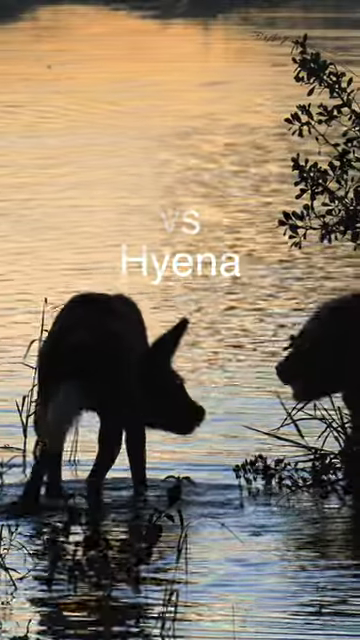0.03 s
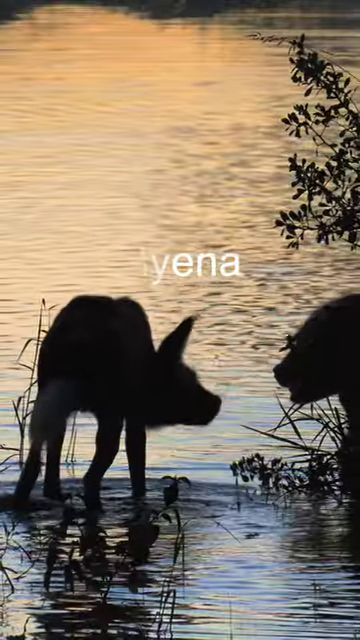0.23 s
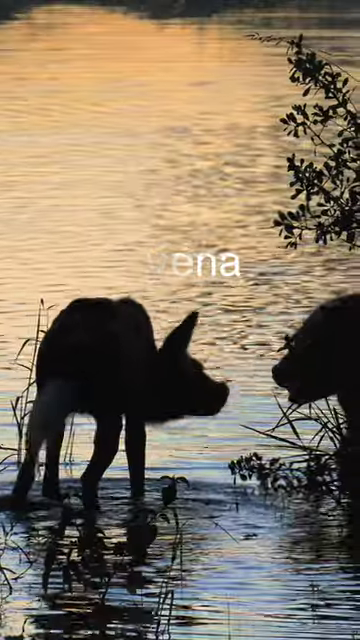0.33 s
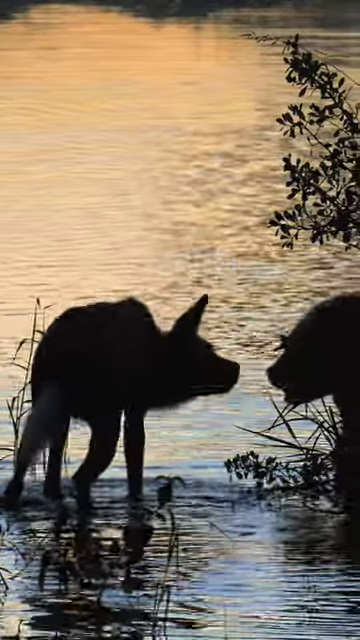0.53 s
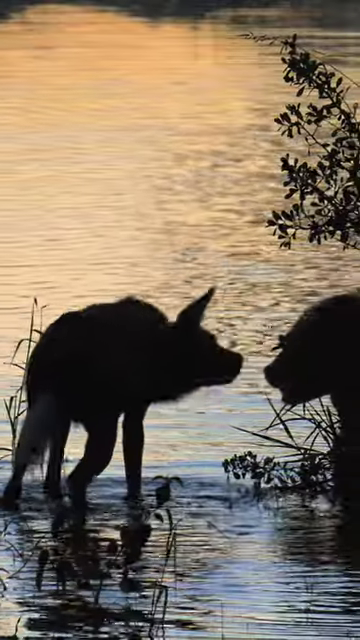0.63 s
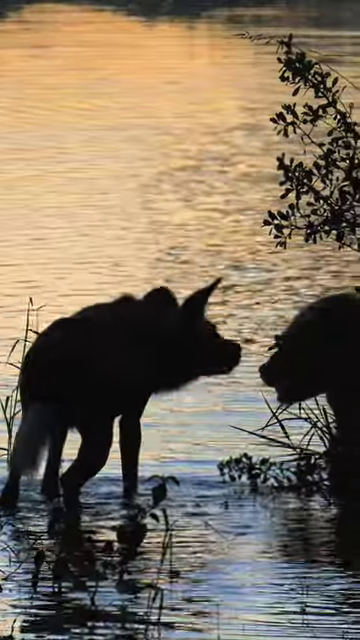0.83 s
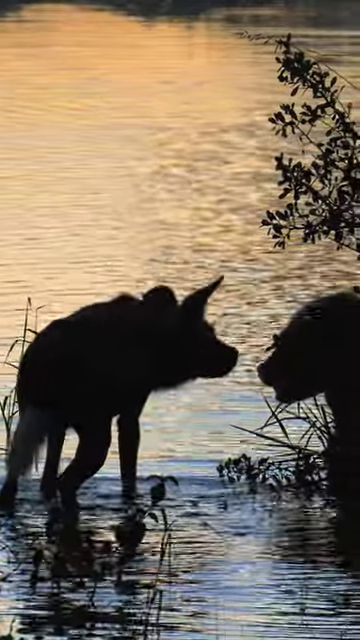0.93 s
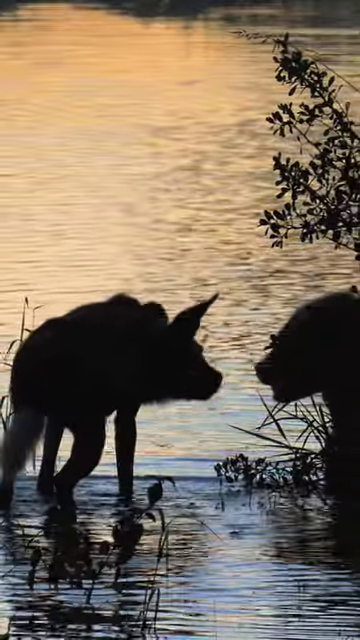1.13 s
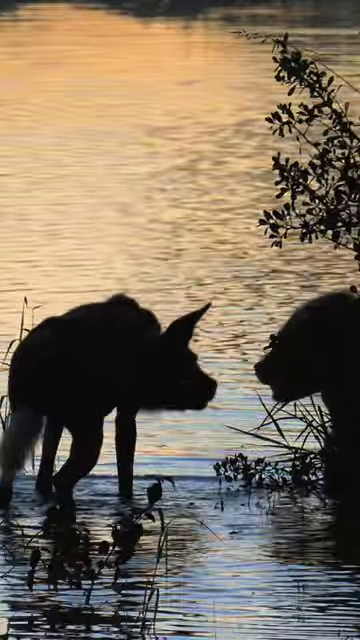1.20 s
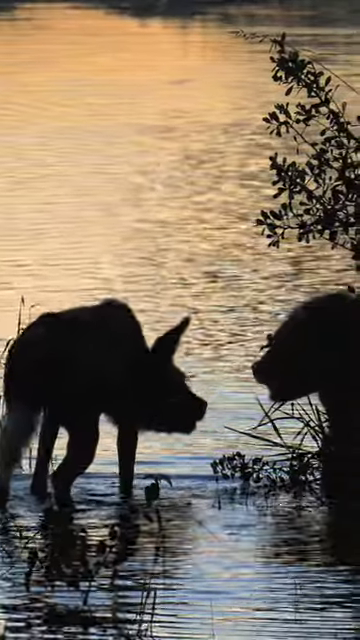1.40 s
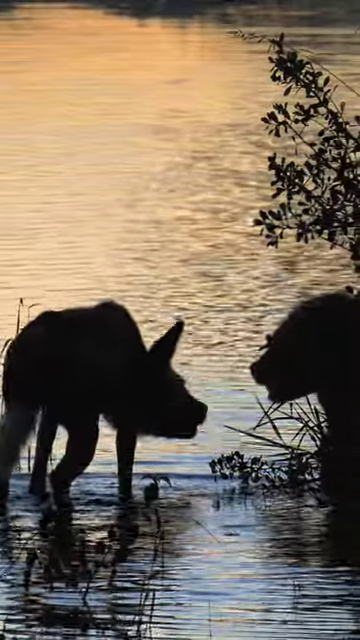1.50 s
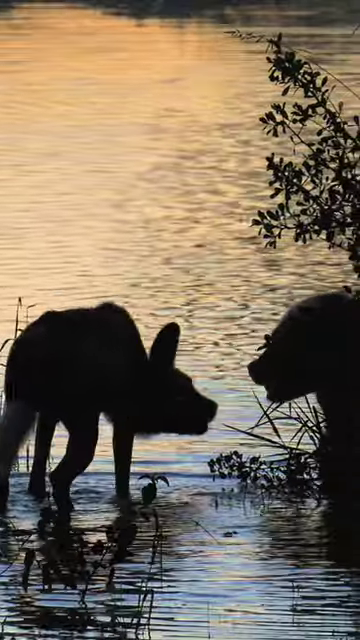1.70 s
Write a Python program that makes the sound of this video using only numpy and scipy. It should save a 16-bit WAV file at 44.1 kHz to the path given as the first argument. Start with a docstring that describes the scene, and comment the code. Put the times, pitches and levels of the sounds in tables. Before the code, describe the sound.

A lion gives one low growl while a hyena sloshes softly through shallow water.

```python
"""At the edge of a waterhole, a lion gives one low growl. Slow, separate vocal-fold pulses speed up
into a clear tone as the throat tenses, sag again and end in a rush of air; the banks echo weakly.
A hyena wades in the shallows: soft sloshes, ringing air pockets, drips and falling spray over the
hiss of stirred water. Behind them lie a low rumble, a faint hum and a thin high note."""
import sys
import numpy as np
from scipy import signal
from scipy.fft import rfft, irfft, next_fast_len
from scipy.io import wavfile

SR = 44100
rng = np.random.default_rng(int(sys.argv[2]) if len(sys.argv) > 2 else 0)


def generate_wav(signal):
    """Clip the signal to [-1, 1] and save it as 16-bit WAV at the path in sys.argv[1]."""
    frames = np.transpose(np.atleast_2d(signal))
    scaled = np.clip(frames, -1, 1) * 32767
    pcm = np.round(scaled).astype(np.int16)
    wavfile.write(sys.argv[1], SR, pcm)


N = 77175
T = np.arange(N) / SR

# background rumble spectrum: freq_hz, gain_db
RUMBLE_SPECTRUM = [(15, 4.5), (40, -22), (600, -36.5)]
# faint steady notes: start_s, end_s, pitch_hz, width_hz, level_db
FAR_NOTES = [(1.48,1.75,135,4,-67),(1.5,1.75,4620,70,-60)]
# left-right likeness of the noise: freq_hz, correlation
STEREO_LIKENESS = [(25, 0), (90, 1), (5500, 0.87), (8500, 0.12), (15000, 0)]

# stirred water: time_s, hiss_db, lapping_db
WATER_LEVELS = [(0,-59.5,-73),(.4,-59.5,-45),(.7,-54,-44.5),(1.15,-55.5,-53.5),(1.38,-49.5,-53),(1.51,-56,-58),(1.72,-48,-56.5)]
# water hiss spectrum: freq_hz, gain_db
HISS_SPECTRUM = [(1000,-8.5),(2000,3.5),(6000,-5.5),(9500,-18.5),(15500,-34.5)]
# lapping spectrum: freq_hz, gain_db
LAPPING_SPECTRUM = [(280,-12.5),(800,0),(1550,0.5),(6000,-67)]
# fine spray falling back: start_s, level_db, decay_s
SPLASHES = [(.722,-49,0.011),(0.847,-51.5,0.022),(1,-50.5,0.021)]
# fine spray spectrum: freq_hz, gain_db
SPLASH_SPECTRUM = [(1200, -22.5), (2500, -3), (4500, -1.5), (6800, -6), (9000, -17), (15000, -27.5)]
# drops landing: start_s, tick_db, pitch_hz, snap_db
DRIPS = [(0.361, -38, 6260, -42), (.375, -37.5, 6240, -47.5), (1.182, -29, 4200, -30),
         (1.237, -34.5, 4800, -42)]
# snap of a drop breaking the surface: freq_hz, gain_db
SNAP_SPECTRUM = [(1500, -22), (3800, 0), (6500, 1), (9000, -2), (15000, -16)]
# air pockets: start_s, level_db, pitch_hz
GURGLES = [(1.003,-38,620),(1.034,-39.5,503),(1.327,-38.5,600),(1.371,-36,474)]
# steps in the shallows: start_s, thud_db, spray_db, decay_s
STEPS = [(1.368, -53.5, -44, 0.023), (1.598, -66, -44, 0.016), (1.696, -49.5, -41.5, 0.019)]
# step thud spectrum: freq_hz, gain_db
THUD_SPECTRUM = [(60, -18.5), (190, 9), (260, -6.5), (1500, -50)]
# step spray spectrum: freq_hz, gain_db
SPRAY_SPECTRUM = [(200, -27), (500, 14), (1800, 12.5), (6000, -16), (12000, -42)]

# air ending the growl: time_s, level_db, mouth_hz
BREATH = [(.74, -44.5, 900), (.80, -39, 900), (.87, -41, 1035), (.95, -42, 980), (1.03, -45, 825.4),
          (1.2, -56, 643)]
# breath spectrum: freq_hz, gain_db
BREATH_SPECTRUM = [(280,-14),(650,2.5),(1600,-14),(5000,-56.5)]
# wet rasp in the mouth: time_s, level_db
WET_RASP_LEVEL = [(0.422, -72), (.49, -60), (0.679, -66.5), (.74, -70)]
# deep chest tone: time_s, gain_db
CHEST_GAIN = [(0, -53.5), (0.241, -55), (0.369, -44), (.55, -46.5), (.72, -47), (0.851, -54.5), (1.0, -86)]
# chest harmonics: multiple, slack_db, tense_db
CHEST_HARMONICS = [(1, -3, -2.5), (2, -1.5, -17), (3, 0.5, 3.5), (4, -1.5, 6), (5, -4, -8)]
# slack throat response, slow pulses: freq_hz, gain_db
SLACK_THROAT = [(200,-34.5),(470,2),(780,5.5),(1040,-11.5),(1350,-3),(2500,-42),(12000,-71)]
# tense throat response, fast pulses: freq_hz, gain_db
TENSE_THROAT = [(150,-43.5),(290,-21.5),(460,9),(560,1.5),(920,5),(1070,-20),(1270,7),(1440,-12),(1690,-7),(1800,-22.5),(2500,-53),(12000,-71)]
# narrow resonance, strong on the rise and fall of the pitch: time_s, gain
THROAT_RING = [(0.376, 1.5), (0.441, 8), (0.502, 0.12), (.63, 0.45), (0.699, 8.7), (0.772, 2.4)]
# vocal-fold pulse rate: time_s, rate_hz
PULSE_RATE = [(0, 46.2), (.19, 48.1), (.28, 55), (.36, 68.7), (.43, 85.5), (.53, 90.1), (.62, 87.4),
              (.69, 81.9), (.76, 55.7), (.92, 38)]
# pulse strength: time_s, gain_db
EFFORT = [(0,-41.5),(.1,-47),(.21,-44),(.295,-31.5),(.36,-29.5),(.4,-32.5),(.46,-27.5),(.54,-25.5),(.71,-33.5),(.8,-35),(.83,-73)]
# voice roughness: time_s, fraction
ROUGHNESS = [(0, .2), (.11, .2), (.16, .5), (.22, .25), (.28, .18), (.40, .12), (.46, .03), (.66, .04),
             (.73, .25), (.79, .45)]


def from_db(db):
    return 10 ** (np.asarray(db) / 20)


def unit_rms(x):
    return x / np.sqrt(np.mean(x ** 2) + 1e-20)


def in_time(rows):
    """Table columns interpolated per sample."""
    time_s, *columns = np.transpose(rows)
    return [np.interp(T, time_s, column) for column in columns]


def at_hz(spectrum, hz):
    """Spectrum interpolated on a log-frequency axis."""
    freq_hz, values = np.transpose(spectrum)
    return np.interp(np.log(hz + 1), np.log(freq_hz), values)


def colour(x, spectrum):
    """Minimum-phase filter; keeps the power of white noise."""
    size = 2 * next_fast_len(N)
    gain = unit_rms(from_db(at_hz(spectrum, np.fft.rfftfreq(size, 1 / SR))))
    cepstrum = irfft(np.log(gain))
    cepstrum[1:size // 2] *= 2
    cepstrum[size // 2 + 1:] = 0
    return irfft(rfft(x, size) * np.exp(rfft(cepstrum)))[..., :N]


def resonate(x, hz, width_hz, passes=1):
    """Two-pole resonance, unity peak gain."""
    r = np.exp(-np.pi * width_hz / SR)
    feedback = [1, -2 * r * np.cos(2 * np.pi * hz / SR), r * r]
    for _ in range(passes):
        x = signal.lfilter(np.array([1, 0, -1]) * (1 - r * r) / 2, feedback, x)
    return x


def lowpass(x, cutoff_hz):
    return signal.sosfilt(signal.butter(2, cutoff_hz, fs=SR, output="sos"), x)


def noise():
    return rng.standard_normal(N)


def wide_noise(spectrum):
    """Stereo noise: sides alike in the midrange, apart in the treble."""
    likeness = np.clip(at_hz(STEREO_LIKENESS, np.fft.rfftfreq(N, 1 / SR)), 0, 1)
    mid = irfft(rfft(noise()) * np.sqrt((1 + likeness) / 2), N)
    side = irfft(rfft(noise()) * np.sqrt((1 - likeness) / 2), N)
    return colour(np.array([mid + side, mid - side]), spectrum)


def clicks(times_s, sizes):
    return np.bincount(np.clip(times_s * SR, 0, N - 1).astype(int), sizes, N)


def burst(start_s, attack_s, decay_s):
    """Linear rise, exponential fall."""
    age_s = T - start_s
    return np.clip(age_s / attack_s, 0, 1) * np.exp(-np.maximum(age_s - attack_s, 0) / decay_s)


def pan(x, left_over_right_db):
    return x * from_db(np.array([[1], [-1]]) * left_over_right_db / 2)


def surroundings(rumble_db=-58, fade_s=0.036):
    """Low rumble, a faint hum and a thin, insect-like high note."""
    out = from_db(rumble_db) * wide_noise(RUMBLE_SPECTRUM)
    for start_s, end_s, pitch_hz, width_hz, level_db in FAR_NOTES:
        fade = np.clip((T - start_s) / fade_s, 0, 1) * np.clip((end_s - T) / fade_s + 1, 0, 1)
        out += from_db(level_db) * fade * unit_rms(resonate(noise(), pitch_hz, width_hz, passes=2))
    return out


def bank_echo(x, gain_db=-30, t60_s=0.24, delay_s=0.027):
    """Weak echo scattered by the banks."""
    tail = noise() * from_db(-60 * T / t60_s) * (T > delay_s)
    return from_db(gain_db) * signal.fftconvolve(x, tail / np.linalg.norm(tail))[:N]


def droplets(rate_per_s=450, spread_db=5):
    """Tiny droplets, each ringing a few cycles."""
    sizes = from_db(spread_db * np.minimum(rng.exponential(1, N), 3))
    impacts = sizes * rng.choice([-1, 1], N) * (rng.random(N) < rate_per_s / SR)
    pitches_hz = np.geomspace(1500, 6800, 20)
    pitch_index = rng.integers(0, len(pitches_hz), N)
    rings = sum(resonate(impacts * (pitch_index == k) + 1e-18, hz, 0.14 * hz) / np.sqrt(hz)
                for k, hz in enumerate(pitches_hz))
    return unit_rms(colour(unit_rms(rings), HISS_SPECTRUM))


def stirred_water(droplet_gain_db=-7):
    """Stirred shallows: hiss with droplets over low lapping."""
    hiss_db, lapping_db = in_time(WATER_LEVELS)
    hiss = from_db(droplet_gain_db) * droplets() + wide_noise(HISS_SPECTRUM)
    return from_db(hiss_db) * hiss + from_db(lapping_db) * wide_noise(LAPPING_SPECTRUM)


def splashes(attack_s=0.012):
    """Fine spray falls back in short bright bursts."""
    envelope = sum(from_db(level_db) * burst(start_s, attack_s, decay_s)
                   for start_s, level_db, decay_s in SPLASHES)
    return envelope * wide_noise(SPLASH_SPECTRUM)


def drips(tick_s=0.0005, spatter_gain_db=-14, spatter_decay_s=0.006):
    """Each drop lands with a bright snap, a high tick and a little spatter."""
    starts_s, _, _, snap_db = np.transpose(DRIPS)
    out = colour(clicks(starts_s + tick_s, from_db(snap_db)), SNAP_SPECTRUM)
    spatter = from_db(spatter_gain_db) * wide_noise(SPLASH_SPECTRUM)
    for start_s, tick_db, pitch_hz, _ in DRIPS:
        tick = burst(start_s, tick_s, tick_s) * np.sin(2 * np.pi * pitch_hz * (T - start_s))
        out = out + from_db(tick_db) * (tick + spatter * burst(start_s, tick_s, spatter_decay_s))
    return out


def gurgles(sink_per_s=2.31, wobble_depth=0.13):
    """Air pockets ring briefly, unsteady and sinking in pitch."""
    out = 0
    for start_s, level_db, pitch_hz in GURGLES:
        wobble = wobble_depth * unit_rms(lowpass(noise(), cutoff_hz=158))
        glide_hz = pitch_hz * np.exp(wobble - sink_per_s * np.maximum(T - start_s, 0))
        envelope = from_db(level_db) * burst(start_s, attack_s=0.0032, decay_s=0.025)
        out += envelope * np.sin(2 * np.pi * np.cumsum(glide_hz) / SR)
    return out


def sloshes(attack_s=0.0055):
    """Each hyena step pushes water aside with a thud and throws spray."""
    thud, spray = colour(noise(), THUD_SPECTRUM), colour(noise(), SPRAY_SPECTRUM)
    return sum(burst(start_s, attack_s, decay_s) * (from_db(thud_db) * thud + from_db(spray_db) * spray)
               for start_s, thud_db, spray_db, decay_s in STEPS)


def breath(mouth_width_hz=260, mouth_gain=1.34):
    """The voice gives way to air; the mouth resonance falls as the jaws close."""
    level_db, mouth_hz = in_time(BREATH)
    baseband = lowpass(noise() + 1j * noise(), mouth_width_hz / 2)
    mouth = unit_rms(np.real(baseband * np.exp(2j * np.pi * np.cumsum(mouth_hz) / SR)))
    return from_db(level_db) * unit_rms(2 * colour(noise(), BREATH_SPECTRUM) + mouth_gain * mouth)


def wet_rasp(cycles, decay_cycles=0.7):
    """High, wet noise in the mouth, pulsing with the voice."""
    level_db, = in_time(WET_RASP_LEVEL)
    puffs = noise() * np.exp(-(cycles % 1) / decay_cycles)
    return from_db(level_db) * unit_rms(resonate(puffs, hz=6120, width_hz=800, passes=2))


def chest(rate_hz, cycles, shimmer, slack_hz=47, tense_hz=57, band_hz=(88.7, 248), shimmer_db=8):
    """The chest hums on low harmonics of the pulse rate."""
    gain_db, = in_time(CHEST_GAIN)
    hum = 0
    for multiple, slack_db, tense_db in CHEST_HARMONICS:
        harmonic_db = np.interp(rate_hz, [slack_hz, tense_hz], [slack_db, tense_db])
        hum -= from_db(harmonic_db) * np.cos(2 * np.pi * multiple * cycles)
    hum *= from_db(gain_db + shimmer_db * shimmer)
    return signal.sosfilt(signal.butter(4, band_hz, "band", fs=SR, output="sos"), hum)


def throat(source, rate_hz, slack_hz=47, tense_hz=83):
    """The throat tenses as the pulses speed up; a lower resonance opens at the top of the pitch."""
    ring_gain, = in_time(THROAT_RING)
    tension = np.interp(rate_hz, [slack_hz, tense_hz], [0, 1]) ** 2
    voice = colour((1 - tension) * source, SLACK_THROAT) + colour(tension * source, TENSE_THROAT)
    voice += ring_gain * resonate(voice, hz=663.4, width_hz=20.7)
    deep_gain = 1.2 * (rate_hz / rate_hz.max()) ** 11
    return voice + deep_gain * resonate(voice, hz=372.6, width_hz=78)


def vocal_folds(rate_hz, cycles, jitter_s=0.0006, shimmer_db=5.5, slap_delay_s=0.0045, rasp_cycles=0.63):
    """The folds slap shut once a cycle, twice when rough, with a puff of rasp."""
    effort_db, = in_time(EFFORT)
    rough, = in_time(ROUGHNESS)
    closures = np.flatnonzero(np.diff(np.floor(cycles)))
    jitter, strength, slap, lag = rng.standard_normal((len(closures), 4)).T
    shimmer = rough * np.interp(T, T[closures], strength)  # pulse-to-pulse level flutter
    first_s = T[closures] + jitter_s * rough[closures] * jitter
    second_s = first_s + slap_delay_s * np.exp(0.17 * lag)
    sizes = from_db(effort_db + shimmer_db * shimmer)[closures] * np.sqrt(SR / rate_hz.max())
    pulses = clicks(first_s, sizes) + clicks(second_s, 1.1 * sizes * rough[closures] * abs(slap))
    puffs = noise() * unit_rms(np.exp(-(cycles % 1) / rasp_cycles))
    rasp = 0.3 * rough * from_db(effort_db) * puffs
    return pulses + rasp, shimmer


def growl(start_cycle=0.6):
    """Fold pulses sound through the throat; chest and wet rasp follow the same cycle."""
    rate_hz, = in_time(PULSE_RATE)
    cycles = start_cycle + np.cumsum(rate_hz) / SR
    source, shimmer = vocal_folds(rate_hz, cycles)
    return throat(source, rate_hz) + chest(rate_hz, cycles, shimmer) + wet_rasp(cycles)


def scene():
    lion = growl() + breath()
    echo = bank_echo(lion)
    shallows = pan(stirred_water() + splashes() + drips(), left_over_right_db=1.65)
    return lion + echo + shallows + sloshes() + gurgles() + surroundings()


def record(dry):
    """Steep low-pass on the top treble."""
    cutoff_hz = 15800
    return signal.sosfilt(signal.ellip(10, 0.1, 80, cutoff_hz, fs=SR, output="sos"), dry)


dry = scene()
out = record(dry)
generate_wav(out)
```